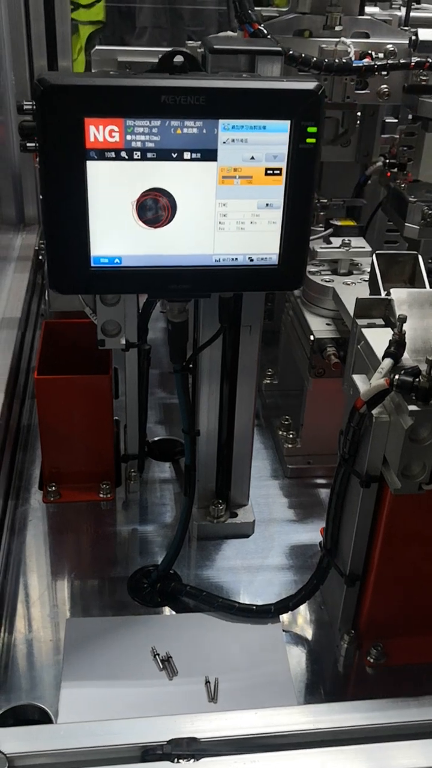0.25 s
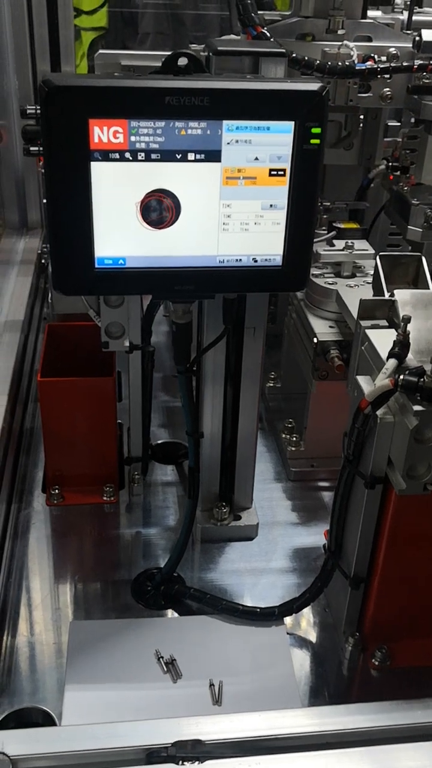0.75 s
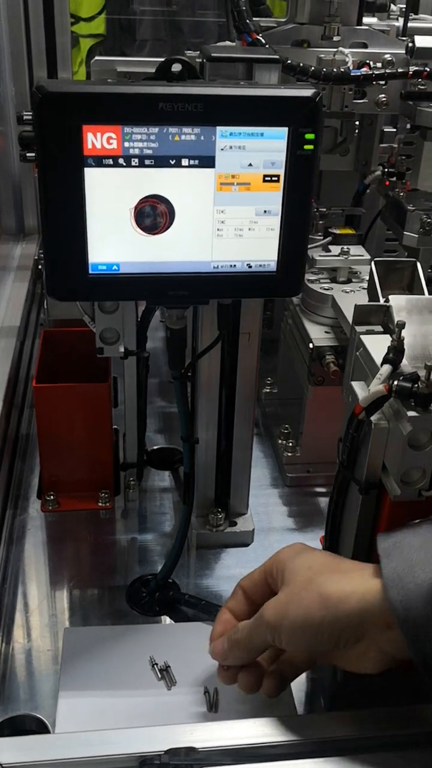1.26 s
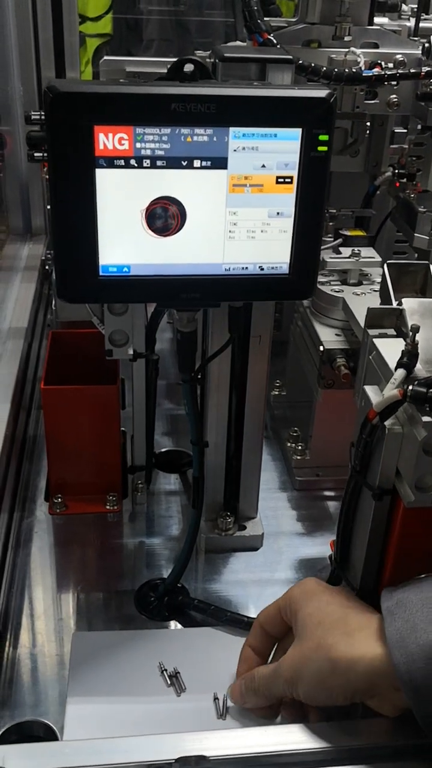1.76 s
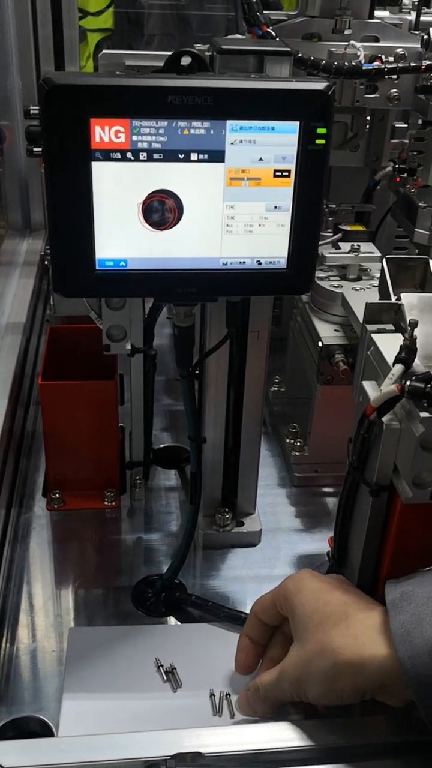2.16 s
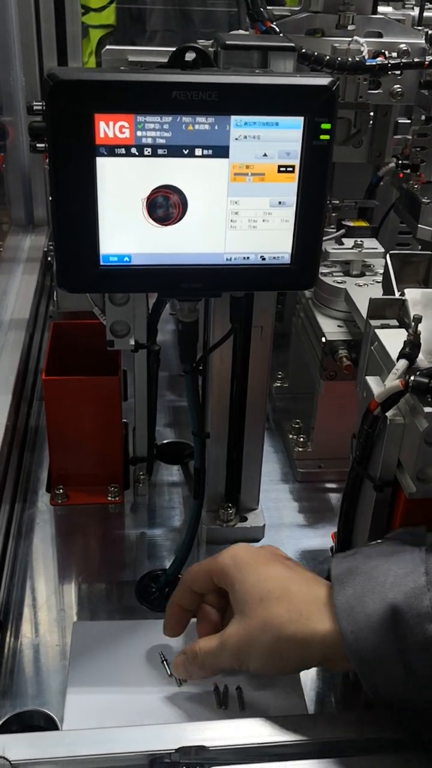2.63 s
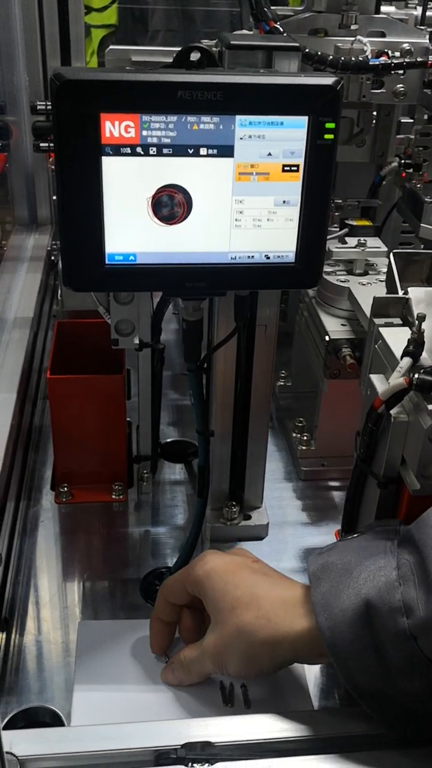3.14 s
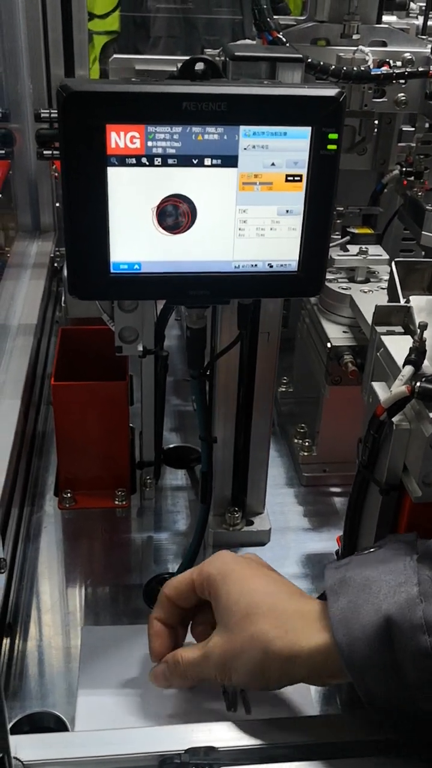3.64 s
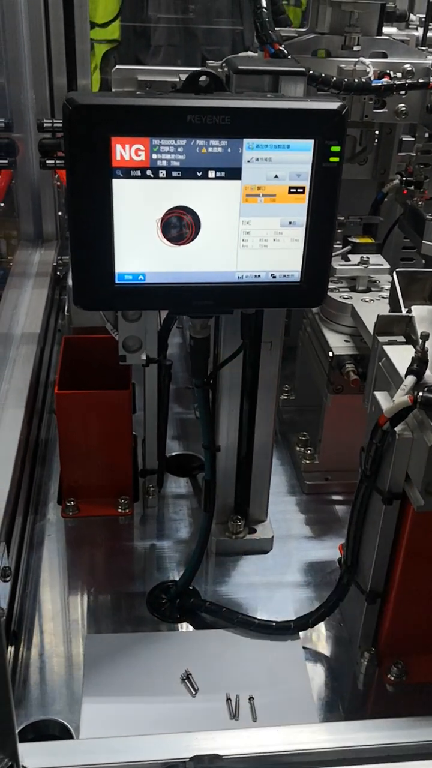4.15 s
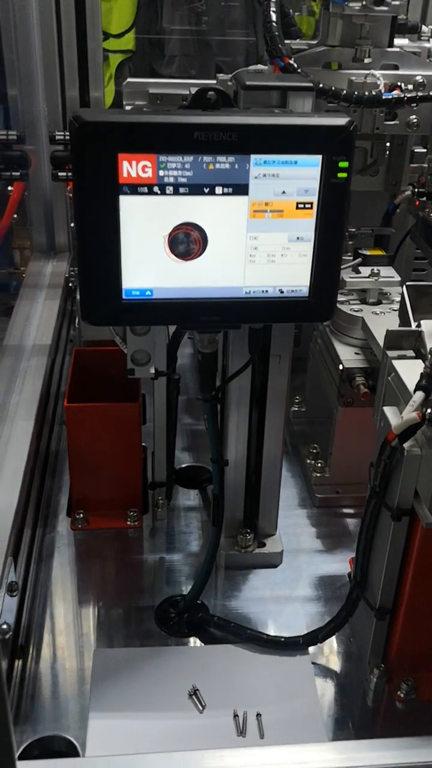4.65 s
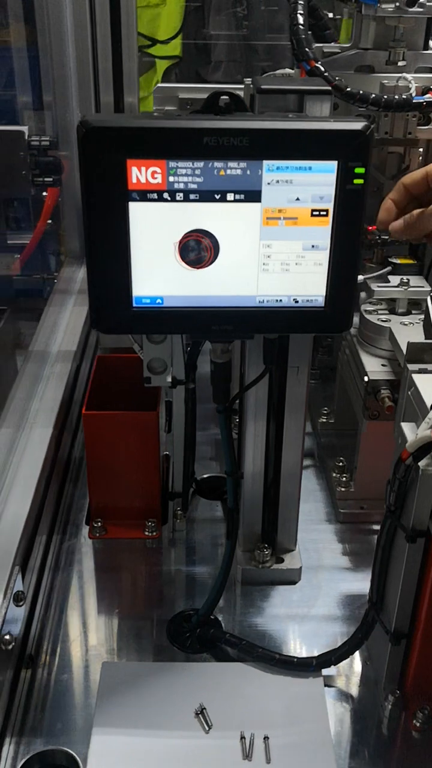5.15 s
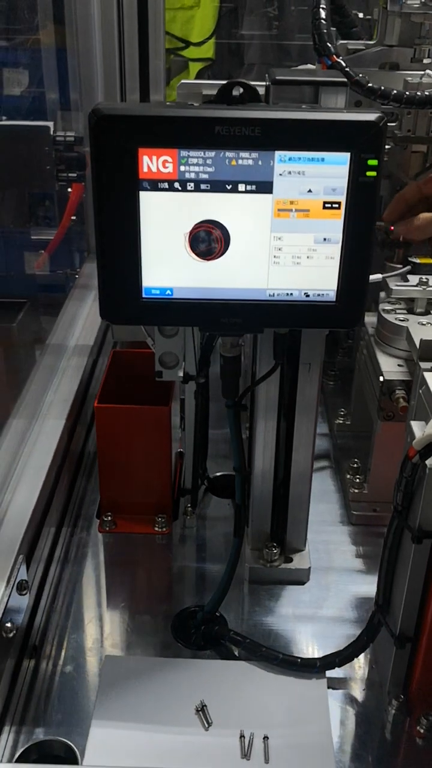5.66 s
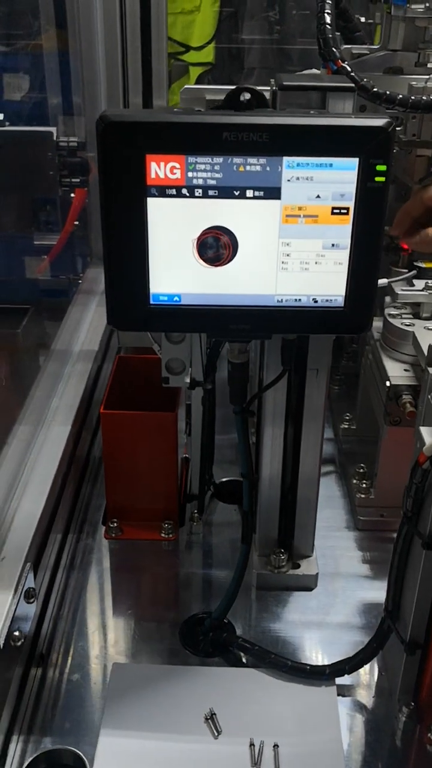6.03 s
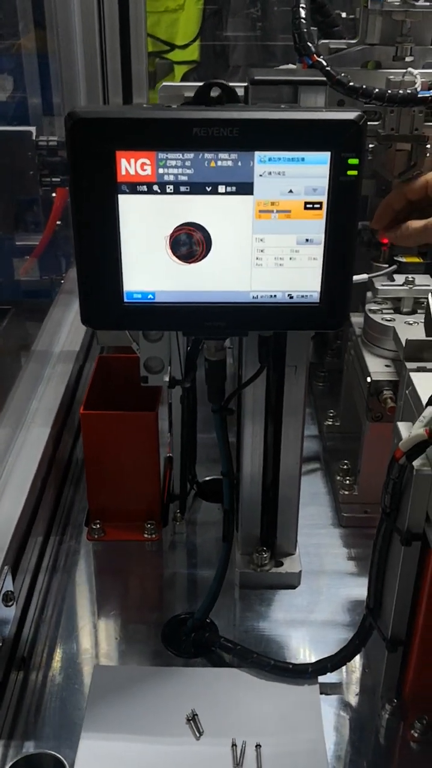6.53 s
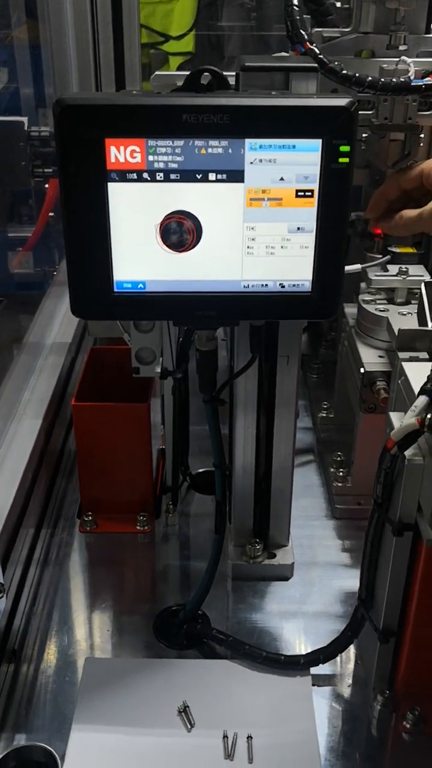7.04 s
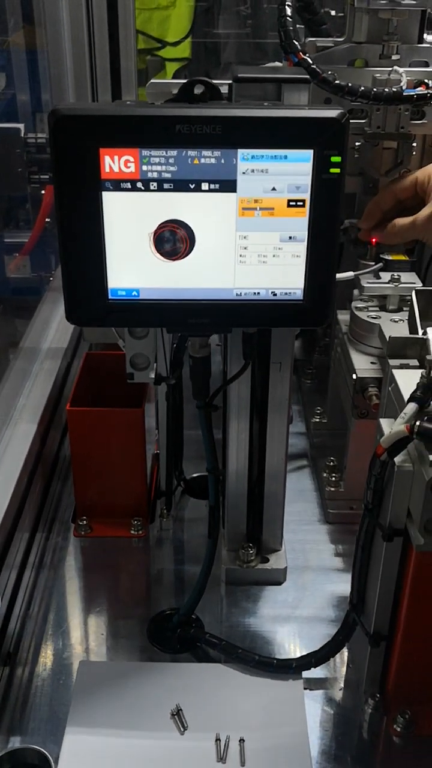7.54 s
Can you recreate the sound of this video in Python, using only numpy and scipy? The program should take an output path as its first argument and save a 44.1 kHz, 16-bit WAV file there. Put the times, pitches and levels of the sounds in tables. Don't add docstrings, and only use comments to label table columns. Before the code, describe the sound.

An assembly machine clanks and sighs close by while bursts of compressed air hiss in quick succession over low motor hum and fan noise.

```python
import sys
import numpy as np
from scipy import signal
from scipy.fft import rfft, irfft, next_fast_len
from scipy.io import wavfile
from scipy.ndimage import uniform_filter1d, map_coordinates

SR = 44100
rng = np.random.default_rng(int(sys.argv[2]) if len(sys.argv) > 2 else 0)


def ratio_of_db(decibels):
    return 10 ** (np.asarray(decibels, float) / 20)


def transcribe(u):
    v = np.clip(np.atleast_2d(u).T, -1, 1)
    q = np.round(v * 32767).astype(np.int16)
    wavfile.write(sys.argv[1], SR, q)


N = 343521

# crack_s, full_s, shut_s, open_level_db, shut_level_db
AIR_BLASTS = [(2.282, 2.333, 2.54, -28.5, -29.5), (2.42, 2.605, 2.9, -23.5, -20.5),
              (3.258, 3.387, 3.59, -17.5, -19.5), (3.584, 3.684, 3.81, -19.5, -21),
              (3.907, 4.026, 4.24, -21, -18.5), (4.332, 4.444, 4.956, -19.5, -20.5),
              (5.283, 5.38, 5.722, -19.5, -21), (5.876, 5.965, 6.09, -19, -20),
              (6.117, 6.207, 6.57, -19.5, -22.5), (6.54, 6.674, 7.0, -22, -22),
              (6.95, 7.063, 7.74, -21.5, -19.5)]
BLAST_ROAR = [-25, -30.5, -24.5, -18, -21, -22.5, -16.5, -13.5, -13.5, -12, -17]
# time_s, body_over_hiss_db
JET_AIM = [(2.3, -12), (2.9, -17), (3.4, -25.5), (3.75, -16.5), (4.1, -24), (4.3, -14), (4.5, -7),
           (4.9, -9.5), (5.4, -15.5), (5.65, -9.5), (6.0, -14), (6.22, -19.5), (6.4, -12), (6.65, -12),
           (6.78, -7), (7.0, -10), (7.79, -9)]
# freq_hz, density_db
HISS_SPECTRUM = [(1200, -39), (2500, -10), (4000, -8), (6000, 1), (8000, -0.5), (9500, -2), (11500, -7),
                 (16000, -12.5)]
# freq_hz, density_db
BODY_SPECTRUM = [(900, -29.5), (1350, -15), (1700, -2.5), (2400, -1.5), (2750, 1), (3100, -3), (4500, -6),
                 (7000, -6)]
# freq_hz, density_db
ROAR_SPECTRUM = [(300, -7), (500, -11.5), (800, -2), (900, 1), (1200, -2), (1500, -2.5), (2200, -1)]
# start_s, level_db, t60_s, low_hz, high_hz
CYLINDER_SLAMS = [(.42, -36.5, 0.92, 2600, 6950), (0.891, -20.5, 0.14, 1500, 4000),
                  (0.891, -23.5, 1.6, 1290, 3300), (.9, -37, 1.2, 3500, 6050), (0.89, -28, 1.4, 560, 1220),
                  (1.071, -21.5, 0.77, 440, 1320), (1.072, -20.5, 1.14, 1140, 4360),
                  (1.07, -27, 1.4, 2200, 2900), (2.17, -40, 0.4, 1200, 7000), (3.39, -38.5, 1.4, 450, 1500),
                  (4.929, -22, .25, 6010, 9100), (5.31, -29, 0.55, 6800, 8160),
                  (5.374, -19, .2, 6050, 8900), (5.43, -25, .15, 6000, 9000), (6.295, -15, 0.48, 806, 2710),
                  (6.519, -20, 0.38, 770, 2300), (6.68, -37, 0.6, 1400, 2600), (6.69, -22, 1.8, 2800, 6370),
                  (6.8, -23, 0.66, 1500, 5500)]
# start_s, level_db,
# t60_s, low_hz, high_hz
VENT_SIGHS = [(.84, -35, 1.6, 1300, 2800), (.94, -33, 2.2, 2000, 2700), (1.078, -32.5, 0.39, 4430, 10100),
              (1.1, -29, 0.59, 480, 990), (1.1, -25.5, 0.48, 2600, 5980), (1.169, -46, 0.22, 4430, 8460),
              (2.76, -39, 1.1, 450, 1400), (3.33, -21, 0.65, 5400, 6360), (3.98, -29.5, 0.78, 400, 2500),
              (4.38, -27.5, 0.74, 450, 2500), (3.68, -25, 0.41, 1800, 3020), (6.33, -21, 1.1, 1180, 2800),
              (6.56, -33.5, 2.5, 523, 900)]
# centre_hz, width_hz, level_db
FRAME_MODES = [(570, 220, -2.5), (876, 450, -4), (1070, 42, 0), (1500, 220, -5), (1820, 500, -2),
               (2460, 670, 2.5), (3500, 980, -6), (5960, 1700, -6)]
# start_s, end_s, first_pitch_hz, last_pitch_hz, level_db
SERVO_TONES = [(0.535, 0.727, 2470, 2480, -56), (.96, 1.059, 190, 217, -35),
               (1.675, 1.823, 4020, 4080, -56), (1.79, 1.838, 4150, 4530, -55),
               (1.83, 1.94, 4500, 4500, -60), (1.863, 1.93, 4750, 4820, -59), (2.332, 2.446, 595, 614, -57),
               (4.071, 4.132, 157, 177, -41.5), (4.165, 4.32, 389, 385, -45), (4.101, 4.21, 625, 610, -51),
               (6.3, 6.337, 1476, 1467, -29), (6.52, 6.56, 864, 850, -34)]
# start_s, length_s, level_db
SLIDE_RUNS = [
    (.33, 0.043, -52),
    (.56, .14, -41.5),
    (0.998, 0.21, -41.5),
    (2.72, 0.15, -43),
    (3.41, 0.26, -27.5),
    (3.698, 0.21, -29.5),
    (4.13, .18, -36.5),
    (4.56, 0.084, -40.5),
    (5.998, 0.15, -38),
    (7.554, 0.084, -40),
]
# freq_hz, density_db
RAIL_SPECTRUM = [(150, -10.5), (230, -4), (300, 1.5), (390, 0), (440, -13.5), (700, -10.5)]
# pitch_hz, level_db, width_hz
MOTOR_LINES = [(59.2, -44.5, 14), (88.1, -37.5, 1.147), (111.7, -41, 2.5), (181.6, -49.5, 16),
               (220.3, -41.5, 2.513), (305, -53.5, 9.2)]
# freq_hz, density_db
RUMBLE_SPECTRUM = [(25, -2), (45, -7.5), (110, 6), (130, -7.5), (170, -1.5), (250, -5), (400, -27),
                   (700, -36), (1200, -47)]
# freq_hz, density_db
FAR_AIR_SPECTRUM = [(250, -9), (500, 1.5), (700, 2), (1200, 4), (2400, 10), (3000, 3.5), (6000, 2),
                    (9500, -3), (11500, -10.5), (16000, -7)]
# freq_hz, correlation (-1 to 1)
PORT_LIKENESS = [(60, 1), (110, 0.9), (200, 1), (380, 0.078), (700, -0.52), (1290, 0.19), (2380, -0.11),
                 (4400, -0.0094), (8120, -0.042), (15000, 0.055)]
# freq_hz, gain_db
LEFT_PORT = [(500, 1.5), (1000, 2), (3000, 0), (5000, 3), (6500, 3.5), (7450, 16.5), (8100, 6.5), (9000, 0),
             (10300, -4), (13000, -2.5)]
# freq_hz, gain_db
RIGHT_PORT = [(500, 1.5), (8200, -3.5), (9500, 4), (10500, -1), (12000, -1)]

CRACKED_DB = 17.5
HISS_T60_S, METAL_T60_S, METAL_LAG_S = 0.53, 1.0, 0.039
LEAK_DB, LEAK_METAL_DB = -39, -9.5
SLAM_RISE_S, VENT_RISE_S = 0.0047, 0.023
SLIDE_EDGE_S, IDLE_DB, IDLE_SWING_DB = 0.037, -45, 2
HUM_DB, FAR_AIR_DB = -1, -41
KNEE_DB, SQUEEZE, RECOVER_S = -32, 0.55, 0.057
TOP_HZ = 15250


def jets():
    t = np.arange(N) / SR
    hiss, body, roar = rush(HISS_SPECTRUM, BODY_SPECTRUM, ROAR_SPECTRUM, patchy_db=1.57)
    no_trim = np.zeros(len(AIR_BLASTS))
    leak = ratio_of_db(LEAK_DB) * (t > AIR_BLASTS[0][1])
    flow = np.hypot(valves(HISS_T60_S, no_trim), leak)
    aim = ratio_of_db(np.interp(t, *np.transpose(JET_AIM)))
    struck = lagged(valves(METAL_T60_S, no_trim) * aim, METAL_LAG_S) + leak * ratio_of_db(LEAK_METAL_DB)
    low = lagged(valves(HISS_T60_S, BLAST_ROAR), METAL_LAG_S)
    flutter = ratio_of_db(0.29 * wobble(11) + 0.47 * wobble(150))
    return flutter * (ratio_of_db(-4) * flow * hiss + ratio_of_db(4) * struck * body + ratio_of_db(3) * low * roar)


def valves(t60_s, trims_db):
    t = np.arange(0, N / SR + 0.01, 0.002)
    power = np.zeros(len(t))
    for (crack, full, shut, open_db, shut_db), trim_db in zip(AIR_BLASTS, trims_db):
        held_db = np.interp(t, [crack, full, shut], [open_db - CRACKED_DB, open_db, shut_db], left=-200)
        decay_db = 60 * np.maximum(t - shut, 0) / t60_s
        power += ratio_of_db(held_db + trim_db - decay_db) ** 2
    return np.interp(np.arange(N) / SR, t, np.sqrt(power))


def slams():
    rattle = diffuse([frame], patchy_db=2.5)[0]
    out = np.zeros((2, N))
    events = [(SLAM_RISE_S, *row) for row in CYLINDER_SLAMS] + [(VENT_RISE_S, *row) for row in VENT_SIGHS]
    for rise_s, start_s, db, t60_s, low_hz, high_hz in events:
        first = round(start_s * SR)
        at = slice(first, min(first + SR, N))
        age = np.arange(at.stop - at.start) / SR
        band = signal.butter(3, [low_hz, high_hz], "band", fs=SR, output="sos")
        swell = ratio_of_db(db - 60 * age / t60_s) * (1 - np.exp(-age / rise_s))
        grain = rattle[:, rng.integers(N - SR):][:, :len(age)]
        out[:, at] += swell * unit(signal.sosfilt(band, grain))
    return out


def frame(hz):
    power = 0
    for centre, width, db in FRAME_MODES:
        damping = hz * width
        power = power + (ratio_of_db(db) * damping) ** 2 / ((centre ** 2 - hz ** 2) ** 2 + damping ** 2)
    return np.sqrt(power)


def tones():
    age = np.arange(SR // 2) / SR
    out = np.zeros((2, N))
    for start, end, first_hz, last_hz, db in SERVO_TONES:
        gate = np.clip(np.minimum(age / 0.0049, (end - start - age) / 0.013 + 1), 0, 1)
        lag = np.array([[0], [rng.random() * min(first_hz / 3000, 0.25)]])
        glide_hz = np.interp(age, [0, end - start], [first_hz, last_hz])
        pitch_hz = glide_hz * (1 + 0.0032 * wobble(39, size=len(age)))
        level = ratio_of_db(db + 5 + 3.3 * wobble(43, size=len(age))) * gate
        tone = level * np.sin(2 * np.pi * (np.cumsum(pitch_hz) / SR + lag))
        out[:, round(start * SR):][:, :len(age)] += tone
    return out


def hall(loud):
    air, rail, rumble = rush(FAR_AIR_SPECTRUM, RAIL_SPECTRUM, RUMBLE_SPECTRUM, patchy_db=1.5)
    heard_power = lagged(np.mean(loud ** 2, 0), RECOVER_S)
    gain_db = -SQUEEZE * 10 * np.log10(1 + heard_power / ratio_of_db(KNEE_DB) ** 2)
    far = ratio_of_db(FAR_AIR_DB + 0.47 * gain_db) * air
    t = np.arange(N) / SR
    rolling = ratio_of_db(IDLE_DB + IDLE_SWING_DB * wobble(6) + 0.5 * gain_db)
    for start, length, db in SLIDE_RUNS:
        inside_s = np.minimum(t - start, start + length - t)
        rolling = rolling + ratio_of_db(db) * np.clip(inside_s / SLIDE_EDGE_S + 1, 0, 1)
    bed = hum() + ratio_of_db(-37.5) * rumble
    return far + ratio_of_db(-6) * rolling * rail + ratio_of_db(HUM_DB + gain_db) * bed


def hum():
    t = np.arange(N) / SR
    lines = np.zeros(N)
    for hz, db, width_hz in MOTOR_LINES:
        drift = np.cumsum(width_hz / 2 * wobble(width_hz + 1)) / SR
        level = ratio_of_db(db + 3.5 + 0.99 * wobble(width_hz + 1))
        lines += level * np.sin(2 * np.pi * (hz * t + drift + rng.random()))
    return lines


def rush(*spectra, patchy_db):
    def colour(spectrum):
        points = [(5, -120), *spectrum, (21000, -120)]
        return lambda hz: ratio_of_db(along(points, hz))
    return diffuse([colour(spectrum) for spectrum in spectra], patchy_db)


def diffuse(colours, patchy_db):
    placed, echo_t60_s = 0.47, 0.17
    bins, frames, m = 257, N // 256 + 3, next_fast_len(N + SR // 2)
    patches = uniform_filter1d(rng.standard_normal((bins, frames)), size=5, axis=0)
    patches = uniform_filter1d(patches, size=10, axis=1)
    z = rng.standard_normal((2, 3, bins, frames)) * ratio_of_db(patchy_db * unit(patches))
    noise = signal.istft(z[0] + 1j * z[1], window="cosine", nperseg=512)[1][:, :N]
    left, right, spot = rfft(noise, m)
    age = np.arange(SR // 2) / SR
    echoes = rng.standard_normal((2, len(age))) * ratio_of_db(-60 * age / echo_t60_s)
    paths = rfft(echoes / np.linalg.norm(echoes[0]), m)
    pair = np.sqrt(1 - placed) * np.array([left, right]) + np.sqrt(placed) * spot * paths
    hz = np.fft.rfftfreq(m, 1 / SR)
    turn = np.arccos(np.clip(along(PORT_LIKENESS, hz), -1, 1)) / 2
    mixed = (np.cos(turn) + np.sin(turn)) * pair + (np.cos(turn) - np.sin(turn)) * pair[::-1]
    return [unit(irfft(mixed * colour(hz), m)[:, :N]) for colour in colours]


def wobble(rate_hz, size=N):
    knots = rng.standard_normal(int(size * rate_hz / SR) + 4)
    return map_coordinates(knots, [np.arange(size) * rate_hz / SR], order=2)


def lagged(x, memory_s):
    keep = np.exp(-1 / (memory_s * SR))
    return signal.lfilter([1 - keep], [1, -keep], x)


def along(points, hz):
    f, v = np.transpose(points)
    return np.interp(np.log(hz + 1), np.log(f + 1), v)


def unit(x):
    return x / np.sqrt(np.mean(x ** 2) + 1e-20)


def filtered(x, response):
    m = next_fast_len(N + 8192)
    return irfft(rfft(x, m) * response(np.fft.rfftfreq(m, 1 / SR)), m)[..., :N]


def scene():
    loud = jets() + slams()
    return hall(loud) + loud + tones()


def roll_off(x):
    return signal.sosfilt(signal.butter(12, 16310, fs=SR, output="sos"), x)


def record(dry):
    ports = filtered(dry, lambda hz: ratio_of_db([along(LEFT_PORT, hz), along(RIGHT_PORT, hz)]))
    ports = ports / (1 + np.abs(ports / 0.9) ** 6) ** (1 / 6)
    mix = filtered(ports, lambda hz: hz < TOP_HZ)
    return roll_off(mix)


dry = scene()
out = record(dry)
transcribe(out)
```